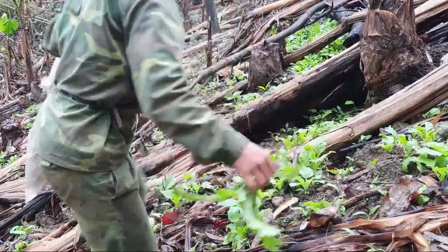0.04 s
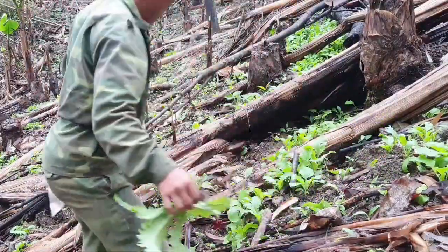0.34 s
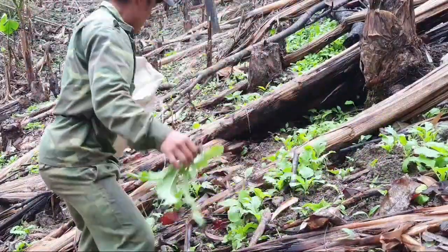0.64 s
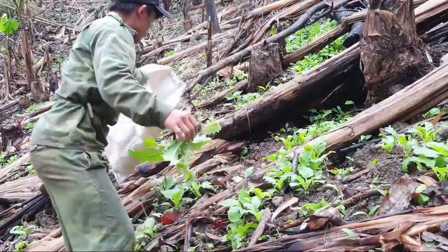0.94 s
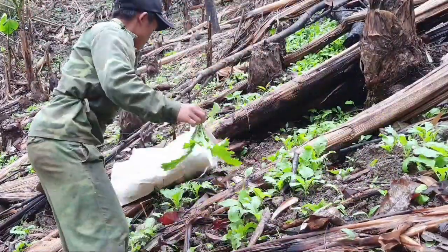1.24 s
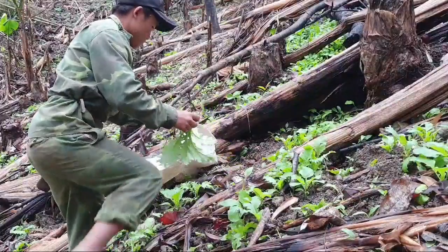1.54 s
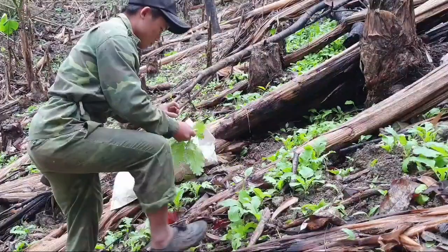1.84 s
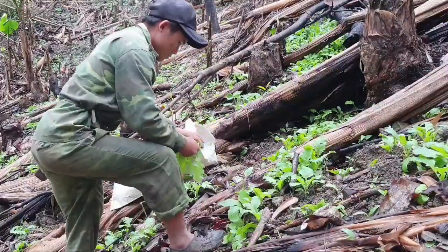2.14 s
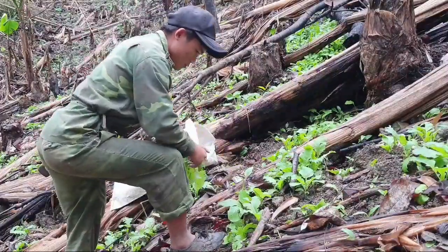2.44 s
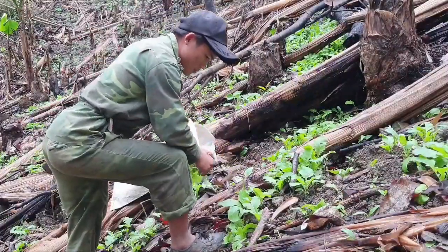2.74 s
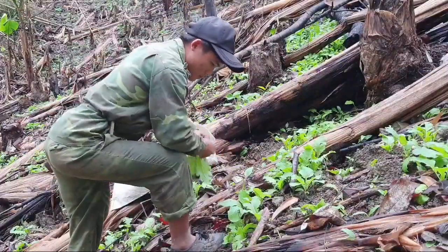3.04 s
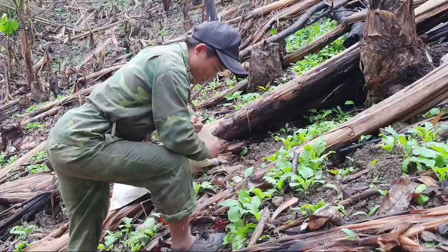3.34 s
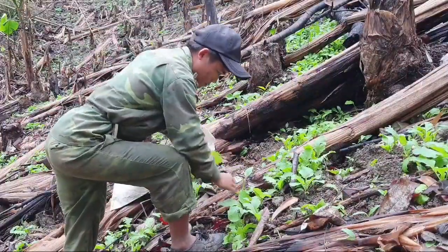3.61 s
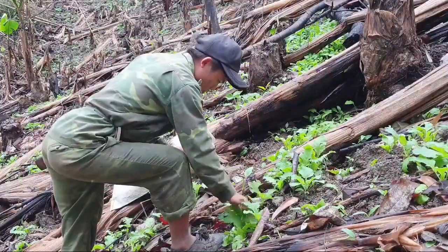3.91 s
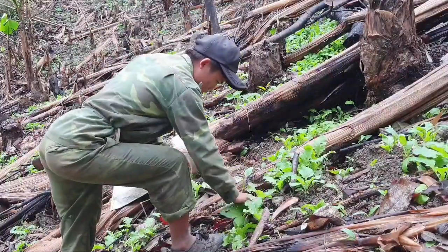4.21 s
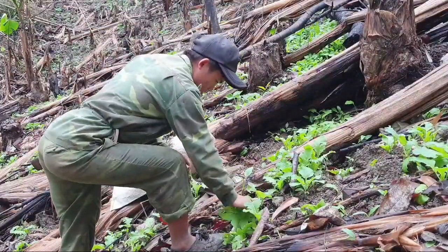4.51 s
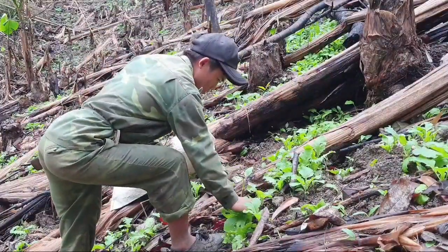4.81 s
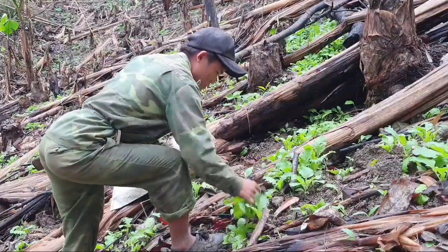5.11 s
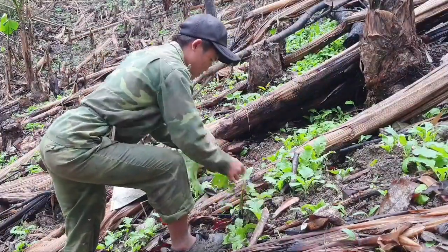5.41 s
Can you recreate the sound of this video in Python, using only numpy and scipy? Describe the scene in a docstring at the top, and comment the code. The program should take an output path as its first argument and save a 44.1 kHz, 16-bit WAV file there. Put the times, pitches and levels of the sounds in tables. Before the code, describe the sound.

A steady, high insect shrill and a faint low rumble of open air fill a wooded slope. Throughout, a small bird ahead gives quick runs of sharp, high ticks with a short forest echo. Slightly to the right, feet crunch through dry litter with twig cracks from 0.2 to 0.7 seconds, then tread again around 1.3 seconds. Leaves and a sack rustle softly near 2 seconds. Picking grows busier from 3.2 to 4 seconds, with crisp stem snaps at about 3.4 and 3.65, another at 5, and a last rustle and snap near 5.4. A farther bird gives rising churrs twice in the first second, then about three a second from 2.8 onward. Thin gliding whistles come and go, clearest around 3.3 to 3.7 seconds. Faint hoarse bird calls sound far off, mostly in the second half.

```python
"""Sharp bird ticks cut through a shrill of insects as someone steps through dry litter on a wooded slope,
picking leafy greens into a sack off to the right. Soles crunch and leaves crackle in showers of tiny
fractures; stems snap with a crack and a short ring. Small birds tick, churr and whistle in quick pitch
glides, and the trees scatter their calls. Hoarse far calls and a low rumble of open air lie behind."""
import sys
import numpy as np
from scipy import signal
from scipy.fft import rfft, irfft
from scipy.io import wavfile
from scipy.ndimage import uniform_filter1d

SR = 44100
rng = np.random.default_rng(int(sys.argv[2]) if len(sys.argv) > 2 else 0)


def wav_record(signal):
    """Record a signal, one row per channel, as 16-bit PCM in the file named by sys.argv[1]."""
    frames = np.transpose(np.atleast_2d(signal))
    bounded = np.clip(frames, -1, 1)
    # unit amplitude maps onto the largest positive 16-bit level
    quanta = np.round(bounded * 32767).astype(np.int16)
    wavfile.write(sys.argv[1], SR, quanta)


N = 245405
TIME, BINS = np.arange(N) / SR, np.fft.rfftfreq(N, 1 / SR)

# All levels are pre-fader. Tone colours: f/Hz, level/dB
SHOVE_COLOUR = [(40, -29), (90, -7), (170, -14), (235, -17), (315, -3), (470, -3), (590, 2.5), (830, -5),
                (1300, -7), (2400, -6.5), (4500, -9), (8700, -10.5), (10300, -21.5), (14000, -15)]
TREAD_COLOUR = [(40, -13), (80, 2), (150, 2.5), (240, -0.5), (340, 2.5), (470, 2), (650, -5), (1100, -4),
                (1900, -6.5), (3000, -10), (5000, -13), (8500, -7), (10300, -23.5), (15500, -15)]
LEAF_COLOUR = [(150, 2), (600, -1.5), (1200, -1.5), (2200, 6.5), (4500, 15), (7000, 10.5), (8800, 8),
               (10300, -9), (12000, 0), (15500, 3.5)]
INSECT_COLOUR = [(2200, -32.5), (2900, -15), (3400, -41), (3950, -12), (4400, 1.5), (4900, 4), (5250, -3),
                 (5500, -6.5), (5850, -4), (6200, -18), (8000, -31), (10000, -58)]
AIR_COLOUR = [(20, -41), (40, -7), (60, 3.5), (95, 3), (160, -7), (300, -9.5), (700, -14), (1300, -13),
              (2100, -25.5), (4500, 1), (8300, -31), (10300, -28), (12500, -26), (15500, -13)]
# the picker's moves: t/s, hold/s, level/dB
FOOT_SHOVES = [(.315, 0.085, -37.5), (.435, 0.077, -35.5), (.565, 0.041, -35.5)]  # a foot pushes through litter
FOOT_TREADS = [(.15, .01, -47.5), (.99, 0.0089, -52), (1.11, .02, -50), (1.285, .06, -40),
               (1.368, 0.023, -33), (1.452, 0.011, -44)]  # weight comes down on it
LEAF_STROKES = [(.43, 0.045, -49), (.69, 0.0084, -51.5), (1.05, 0.27, -60), (1.335, 0.049, -49),
                (2.01, 0.097, -54.5), (2.2, 0.25, -68), (2.6, 0.41, -67), (3.16, 0.37, -59),
                (3.347, 0.011, -46.5), (3.55, 0.43, -55.5), (3.648, 0.014, -47), (4.48, .015, -71),
                (4.88, 0.11, -57), (5.13, 0.13, -51.5), (5.385, .165, -47)]  # a hand or leg brushes leaves and sack
# stems and twigs giving way: t/s, crack level/dB, decay/s, ring f/Hz, ring level/dB, ring left trim/dB
STEM_SNAPS = [(0.2202, -32, 0.0018, 7400, -25, -8), (0.3094, -30, 0.0057, 1170, -30.5, 0),
              (.364, -38, 0.0032, 700, -21.5, 0), (.440, -26, 0.0029, 590, -16, 3),
              (.473, -28, 0.0021, 603, -9.5, -1), (.563, -36, 0.0056, 1450, -25, -4),
              (.631, -32, 0.003, 1110, -20.5, -2), (0.702, -33, 0.0033, 504, -30.5, 0),
              (1.128, -44, 0.015, 1560, -36.5, -8), (1.38, -30, 0.0033, 353, -21.5, 0),
              (1.383, -24.5, 0.0026, 1910, -19, -8), (1.732, -31, 0.0036, 7750, -29, -10),
              (3.161, -33, 0.0012, 8000, -34, 0), (3.351, -25, 0.0056, 15170, -20.5, -9),
              (3.361, -27, 0.0033, 1000, -28, -3), (3.361, -50, .008, 117, -30.5, 2),
              (3.647, -19, 0.00077, 7300, -9, -16), (3.6635, -18, 0.003, 1860, -22, -4),
              (4.178, -43, .001, 11000, -36, -5), (4.7, -39, .002, 8160, -43, -2),
              (4.965, -23, 0.0016, 1410, -23.5, -4), (5.376, -37, .008, 8295, -31, -13),
              (5.423, -29, .003, 8350, -22, -14), (5.426, -28, 0.0027, 1940, -34, -5)]
# the nearest bird's runs: t/s, length/s, tick count, first level/dB, last level/dB, f/Hz
TICK_RUNS = [(.1136, 0.087, 4, -25.5, -27.5, 6080), (0.877, 0.11, 4, -27.5, -28.5, 5590),
             (1.5896, 0.071, 3, -24.5, -25.5, 5670), (1.988, 0.025, 2, -26, -25.5, 5550),
             (2.062, 0.044, 2, -22, -25.5, 5870), (2.234, .0451, 2, -29.5, -22.5, 5670),
             (2.3118, 0, 1, -24, -26, 5360), (2.688, 0.02, 2, -27.5, -23, 5900),
             (2.8407, .0724, 3, -22.5, -21, 5610), (3.015, 0.17, 3, -31.5, -28.5, 5620),
             (3.2333, 0.08, 4, -23.5, -23, 5560), (3.4222, 0, 1, -27.5, -28, 5870),
             (3.566, .1146, 3, -24, -19, 5920), (4.4194, 0.016, 2, -22.5, -18.5, 5940),
             (4.4756, .0342, 2, -23.5, -22.5, 6360), (4.791, 0.13, 5, -29.5, -19, 5680),
             (5.132, 0.081, 3, -29, -26.5, 5590), (5.455, 0.079, 3, -18.5, -25.5, 5930)]
# thin arched seeps that open some runs: t/s, length/s, level/dB
SEEP_CUES = [(2.21, 0.048, -49), (2.63, 0.066, -43.5), (3.233, 0.085, -43)]
# a farther bird's rising churrs: t/s, length/s, level/dB, target f/Hz
CHURR_CUES = [(0.193, .21, -32, 3966), (0.657, .22, -33, 3900), (2.803, 0.21, -37.5, 3856),
              (3.11, .2, -34, 3887), (3.493, .2, -32.5, 3846), (3.784, .2, -33, 3810),
              (4.097, .21, -31.5, 3860), (4.434, .19, -31.5, 3850), (4.721, .21, -33, 3860),
              (5.111, .21, -34, 3880), (5.442, 0.083, -33.5, 3813)]
# clear whistles: t/s, length/s, level/dB, first f/Hz, middle f/Hz, last f/Hz
WHISTLE_CUES = [(.01, 0.13, -53, 2950, 2980, 2946), (1.445, 0.04, -45, 2800, 2875, 3000),
                (1.471, 0.039, -42, 2900, 3230, 4120), (3.147, 0.21, -38, 3950, 3883, 3833),
                (3.341, 0.069, -31, 3780, 3580, 3690), (3.438, 0.124, -35.5, 3580, 3554, 3540),
                (3.506, 0.077, -28, 5170, 5340, 5410), (3.6, 0.048, -23.5, 5380, 5375, 5200),
                (3.767, 0.055, -37.5, 5390, 5420, 5440), (3.939, 0.11, -53, 2320, 2436, 2150),
                (4.073, .14, -52.5, 2130, 1852, 1690), (4.072, 0.044, -46, 2750, 2740, 2940),
                (4.334, 0.04, -52, 7550, 7230, 7360), (4.474, 0.15, -49, 7600, 7330, 7430),
                (4.68, 0.084, -50.5, 7500, 7240, 6970)]
# hoarse calls deep in the wood: t/s, length/s, level/dB, first f/Hz, last f/Hz
FAR_CALL_CUES = [(0.827, 0.15, -53, 938, 1454), (1.758, 0.032, -55.5, 700, 753),
                 (2.146, 0.57, -66, 1340, 1186), (3.128, 0.087, -63, 1380, 1640),
                 (3.42, .073, -50, 1642, 2177), (3.553, .16, -50, 954, 1613),
                 (3.56, 0.074, -55.5, 648, 520), (3.857, 0.17, -56, 1956, 1773),
                 (3.932, 0.05, -53.5, 662, 789), (4.042, .15, -50, 997, 1278),
                 (4.329, 0.25, -52.5, 1987, 1957), (4.725, .087, -60.5, 1450, 1600),
                 (4.827, 0.21, -58.5, 1112, 1203)]
# fader ride of the insect bed: t/s, level/dB
INSECT_RIDE = [(0, -41), (1, -43), (1.8, -44), (2.4, -41.5), (2.6, -43.5), (3.3, -40.5), (3.8, -42),
               (4.2, -40), (4.7, -41.5), (5.1, -41.5), (5.56, -42.5)]
# rightward pan: f/Hz, left minus right level/dB
PAN_CURVE = [(60, -11), (400, -9), (1000, -9), (2400, -5), (4400, -3), (8100, -11), (12000, -5),
             (15000, -5)]
# likeness of the two channels: f/Hz, correlation/(0-1)
NEAR_LIKENESS = [(60, 0.95), (600, 1), (2000, 0.3), (5000, 0.45), (9000, 0.06), (15000, 0.18)]
AIR_LIKENESS = [(60, 0.59), (300, 0.37), (700, 0.56), (1400, 0.16), (3000, 0.49), (7000, 0.24),
                (15000, 0.39)]
INSECT_LIKENESS = [(3000, 0.93), (7000, 0.68)]


def gain_of(db):
    """Decibels to gain."""
    return 10 ** (np.asarray(db) / 20)


def curve(points):
    """Draws a table across the spectrum on a log-frequency axis."""
    hz, value = np.transpose(points)
    return np.interp(np.log(BINS + 1), np.log(hz + 1), value)


def add(mix, s, sound):
    """Lays a sound into the mix at time s."""
    part = mix[..., max(round(s * SR), 0):][..., :sound.shape[-1]]
    part += sound[..., :part.shape[-1]]


def stereo(two, colour, likeness):
    """EQs two unrelated signals and blends them into a partly alike stereo pair."""
    right, other = rfft(two) * gain_of(curve(colour))
    shared = np.clip(curve(likeness), 0, 1)
    left = shared * right + np.sqrt(1 - shared ** 2) * other
    return irfft(np.array([left, right]), N)


def pan_right(x):
    """Tips a stereo pair to the right, band by band."""
    ratio = gain_of(curve(PAN_CURVE))
    return irfft(rfft(x) * np.array([ratio, np.ones_like(ratio)]) * 2 / (1 + ratio), N)


def normalise(x, low_hz, high_hz):
    """Scales a pair so that its mid signal has rms 1 inside a band."""
    inside = irfft(rfft(x.mean(0)) * ((BINS > low_hz) & (BINS < high_hz)), N)
    return x / (inside.std() + 1e-12)


def swells(moves, attack_s, release_s):
    """Each move swells, holds and dies away; attack and release are the times for 20 dB."""
    power = np.zeros(N)
    for s, hold, db in moves:
        away = np.maximum((s - TIME) / attack_s, 0) + np.maximum((TIME - s - hold) / release_s, 0)
        power += gain_of(db - 20 * np.minimum(away, 10)) ** 2
    return np.sqrt(power)


def fractures(per_s, spread_db, rub, decay_s=.0005):
    """Tiny breaks of uneven size, each a burst of noise, over a smooth rub."""
    size = gain_of(spread_db * np.minimum(rng.exponential(1, N), 4)) * (rng.random(N) < per_s / SR)
    power = signal.lfilter([1], [1, -np.exp(-1 / (decay_s * SR))], size ** 2)
    return np.sqrt(power / power.mean() + rub ** 2) * rng.standard_normal((2, N))


def footsteps():
    """Dry litter crunches as a sole shoves through it or bears down on it."""
    sliding, pressing = (fractures(per_s=1100, spread_db=2.5, rub=.7) for _ in range(2))
    shove = normalise(stereo(sliding, SHOVE_COLOUR, NEAR_LIKENESS), 300, 2400)
    tread = normalise(stereo(pressing, TREAD_COLOUR, NEAR_LIKENESS), 100, 2400)
    shove *= swells(FOOT_SHOVES, attack_s=0.075, release_s=0.13)
    tread *= swells(FOOT_TREADS, attack_s=0.11, release_s=0.051)
    return gain_of(-1) * (shove + tread)


def leaves():
    """Leaves and sack crackle with each stroke, and stir faintly in between."""
    crackle = fractures(per_s=600, spread_db=3, rub=.8)
    stir = fractures(per_s=150, spread_db=0.5, rub=1.36)
    crackle, stir = (normalise(stereo(x, LEAF_COLOUR, NEAR_LIKENESS), 11000, 15500)
                     for x in (crackle, stir))
    strokes = swells(LEAF_STROKES, attack_s=0.06, release_s=0.074)
    return gain_of(-3) * (strokes * crackle + gain_of(-60.5) * stir)


def stem_snaps(ring_q=3.6, ring_stretch=1.74):
    """A break is a burst of fibre cracks and a short ring of the stem."""
    t = np.arange(SR // 10) / SR
    cracks, rings = np.zeros((2, 2, N))
    for s, crack_db, decay, hz, ring_db, left_db in STEM_SNAPS:
        add(cracks, s, gain_of(crack_db) * np.exp(-t / decay) * rng.standard_normal((2, len(t))))
        band = np.minimum(hz * np.exp(np.array([-.5, .5]) / ring_q), SR * .49)
        resonance = signal.butter(2, band, "band", fs=SR)
        body = signal.lfilter(*resonance, rng.standard_normal(2 * len(t)))[len(t):]
        ring = body / body.std() * np.exp(-t / (ring_stretch * decay)) * (1 - np.exp(-t * hz))
        add(rings, s, gain_of([[ring_db + left_db], [ring_db]]) * ring)
    return gain_of(-7) * stereo(cracks, LEAF_COLOUR, NEAR_LIKENESS) + gain_of(-6) * rings


def bird_note(length, first_hz, middle_hz, last_hz, taper, waver):
    """A pure tone glides through three pitches; fast pitch jitter makes it hoarse."""
    u = np.linspace(0, 1, max(int(length * SR), 16))
    glide = np.polyval(np.polyfit([0, .5, 1], [first_hz, middle_hz, last_hz], 2), u)
    jitter = uniform_filter1d(rng.standard_normal(SR), size=70)
    hz = glide * (1 + waver * jitter[:len(u)] / jitter.std())
    return np.sin(2 * np.pi * np.cumsum(hz) / SR) * signal.windows.tukey(len(u), taper)


def tick_cues(slowing=1.18, detune=0.0473):
    """Spreads each run into ticks (t/s, level/dB, f/Hz) that slow down, swell or fade, and stray in pitch."""
    for start, length, count, first_db, last_db, hz in TICK_RUNS:
        for u in np.linspace(0, 1, round(count)):
            db = first_db + (last_db - first_db) * u
            yield start + length * u ** slowing, db, hz * (1 + detune * rng.uniform(-0.97, 1))


def ticking_bird(lisp_lead_s=.026):
    """Each tick is one up-and-down flick of pitch; soft lead-in lisps and seeps sound only as echo."""
    ticks, lisps = np.zeros((2, N))
    for s, db, hz in tick_cues():
        flick = bird_note(0.0101, .87 * hz, 1.03 * hz, .8 * hz, taper=.8, waver=.03)
        flick *= np.linspace(.5, 1.3, len(flick))  # the downstroke is the louder half
        add(ticks, s - .002, gain_of(db) * flick)
        lisp = bird_note(0.0341, 5400, 6000, 5100, taper=0.3, waver=.14)
        add(lisps, s - lisp_lead_s, gain_of(db - 8) * lisp)
    for s, length, db in SEEP_CUES:
        seep = bird_note(length, 6330, 7960, 6960, taper=0.21, waver=0.056)
        add(lisps, s, gain_of(db + 6) * seep)
    echo = forest_echo(ticks + lisps, t60=0.46, build_s=0.0005, likeness=0.61)
    return gain_of(-3.5) * ticks + gain_of(-2) * echo


def churring_bird(step_s=.033, climb=.24, climb_s=0.0497, swell_s=0.023):
    """A run of hoarse upswept notes swells and climbs in pitch, heard mostly as echo."""
    song = np.zeros(N)
    for s, length, db, target_hz in CHURR_CUES:
        chance = rng.standard_normal((12, 3))
        for delay, (late, accent_db, detune) in zip(np.arange(0, length, step_s), chance):
            hz = target_hz * (1 - climb * np.exp(-delay / climb_s)) * (1 + .012 * detune)
            swell = 1 - 0.75 * np.exp(-delay / swell_s)
            upsweep = bird_note(0.0215, .73 * hz, .95 * hz, .95 * hz, taper=.4, waver=.04)
            add(song, s - .01 + delay + 0.0023 * late, gain_of(db + accent_db) * swell * upsweep)
    return gain_of(-4) * song + gain_of(3) * forest_echo(song, t60=0.63, build_s=0.0016, likeness=0.41)


def whistling_birds(far_db=-50.5, flutter_db=2.0):
    """Thin, fluttering whistles; a nearer bird is louder, purer and drier."""
    direct, send = np.zeros((2, N))
    for s, length, db, *pitches_hz in WHISTLE_CUES:
        nearer_db = db - far_db
        waver = .014 * gain_of(-2 * nearer_db)
        tone = gain_of(db) * bird_note(length, *pitches_hz, taper=.35, waver=waver)
        add(direct, s, tone)
        add(send, s, gain_of(4.5 - .5 * nearer_db) * tone)
    drift = uniform_filter1d(uniform_filter1d(rng.standard_normal(N), size=350), size=150)
    flutter = gain_of(flutter_db * drift / drift.std())
    flutter /= np.sqrt(np.mean(flutter ** 2))
    return pan_right(direct * flutter + forest_echo(send, t60=.65, build_s=.006, likeness=.6))


def far_birds(hoarse_hz=115):
    """Hoarse slurs, blurred by the trees."""
    song = np.zeros(N)
    for s, length, db, first_hz, last_hz in FAR_CALL_CUES:
        middle_hz = (first_hz + last_hz) / 2
        slur = bird_note(length, first_hz, middle_hz, last_hz, taper=0.13, waver=hoarse_hz / middle_hz)
        add(song, s, gain_of(db) * slur)
    echo = forest_echo(song, t60=0.58, build_s=0.0087, likeness=0.53)
    return pan_right(gain_of(-1) * song + gain_of(4) * echo)


def forest_echo(x, t60, build_s, likeness, density=.08):
    """Trunks and leaves return a dense echo that swells briefly and dies away."""
    t = np.arange(SR) / SR
    taps = rng.standard_normal((2, SR)) * (rng.random(SR) < density)
    taps *= gain_of(-60 * t / t60) * (1 - np.exp(-t / build_s))
    taps[1] = likeness * taps[0] + np.sqrt(1 - likeness ** 2) * taps[1]
    taps /= np.linalg.norm(taps, axis=1, keepdims=True)
    return signal.fftconvolve(x[None], taps, axes=1)[:, :N]


def insects(line_hz=5720, line_width_hz=130):
    """Far insects merge into one narrow, shimmering band; another kind holds a thin line above it."""
    drift = uniform_filter1d(rng.standard_normal(N), size=900)
    shimmer = rng.standard_normal((2, N)) * gain_of(drift / drift.std())
    chorus = normalise(stereo(shimmer, INSECT_COLOUR, INSECT_LIKENESS), 4200, 5000)
    line = irfft(rfft(rng.standard_normal(N)) * np.exp(-((BINS - line_hz) / line_width_hz) ** 2), N)
    ride_db = np.interp(TIME, *np.transpose(INSECT_RIDE), left=-120, right=-120)
    return gain_of(ride_db - 1) * (chorus + gain_of(-13) * line / line.std())


def stray_fibres(per_s=6, spread_db=3, decay_s=0.00052):
    """Now and then a dry fibre gives way by itself with a tiny crisp tick."""
    size = gain_of(-54 + spread_db * np.minimum(rng.exponential(1, N), 2))
    breaks = size * (rng.random(N) < per_s / SR)
    envelope = signal.lfilter([1], [1, -np.exp(-1 / (decay_s * SR))], breaks)
    return stereo(envelope * rng.standard_normal((2, N)), LEAF_COLOUR, NEAR_LIKENESS)


def open_air():
    """Low rumble of the valley and a faint even hiss."""
    bed = stereo(rng.standard_normal((2, N)), AIR_COLOUR, AIR_LIKENESS)
    return gain_of(-55.5) * normalise(bed, 40, 900)


def scene():
    """Ticks, churrs and insects sit nearly ahead; the picker, other birds and air lean right."""
    ahead = ticking_bird() * gain_of([[-1], [1]])
    ahead += churring_bird() * gain_of([[-3], [1.2]])
    ahead += insects() * gain_of([[-1.7], [1.4]])
    wildlife = ahead + whistling_birds() + far_birds()
    return wildlife + pan_right(footsteps() + leaves() + stray_fibres() + stem_snaps() + open_air())


def record(dry):
    """A steep high cut takes off the very top of the mix."""
    high_cut = signal.firwin(511, 15750, window=("kaiser", 9), fs=SR)
    return signal.oaconvolve(dry, high_cut[None], "same")


dry = scene()
out = record(dry)
wav_record(out)
```